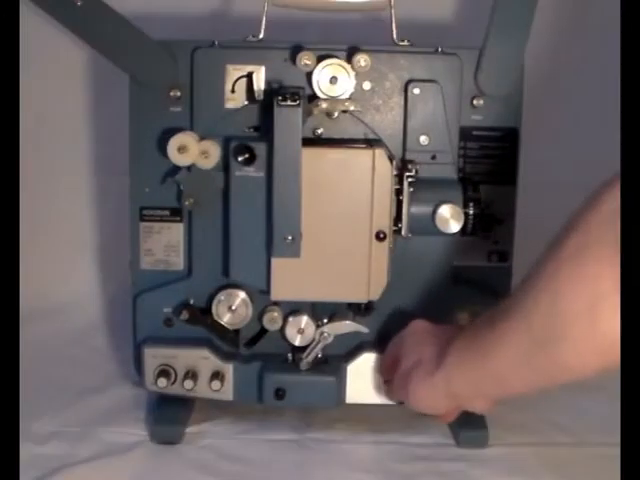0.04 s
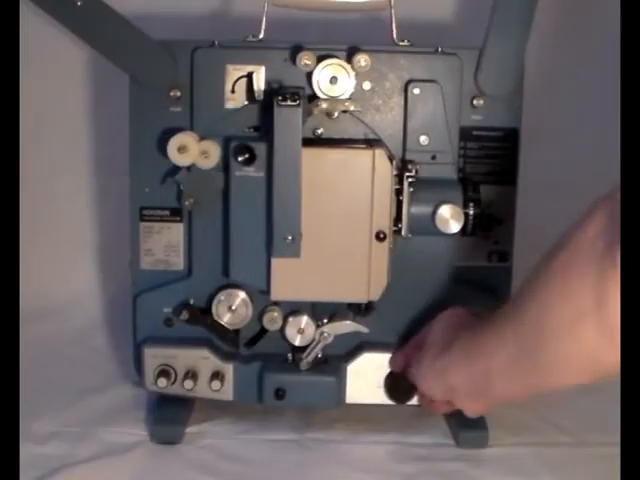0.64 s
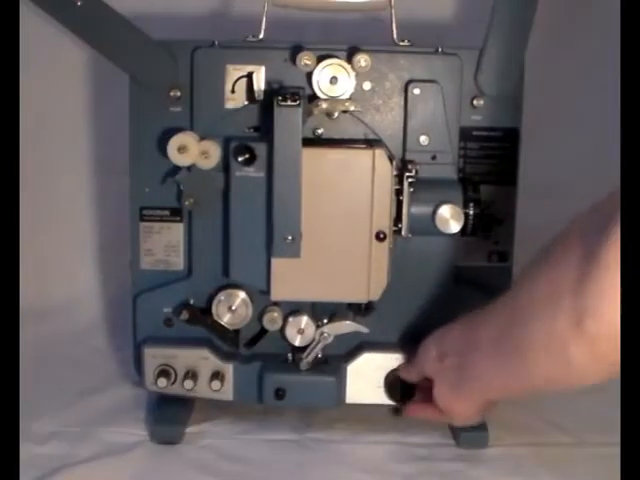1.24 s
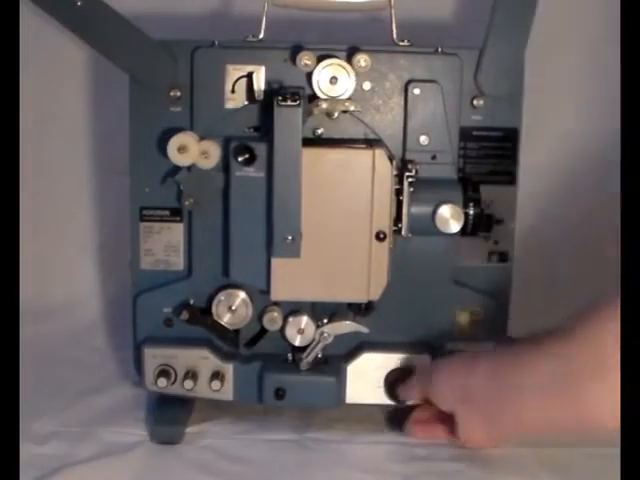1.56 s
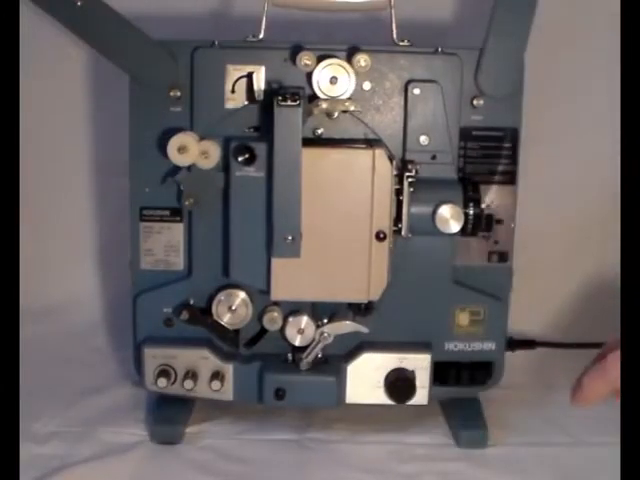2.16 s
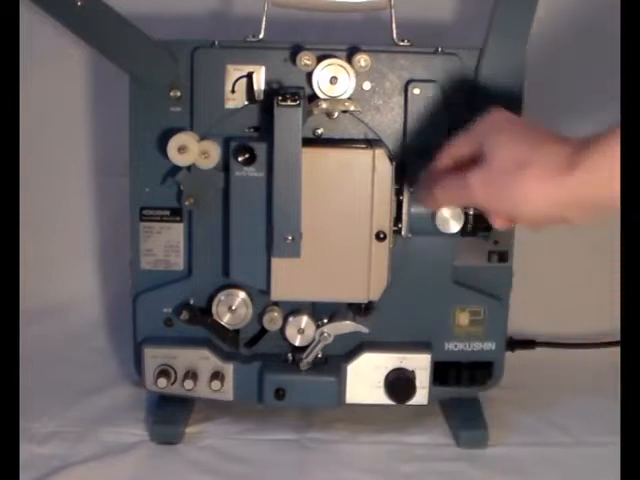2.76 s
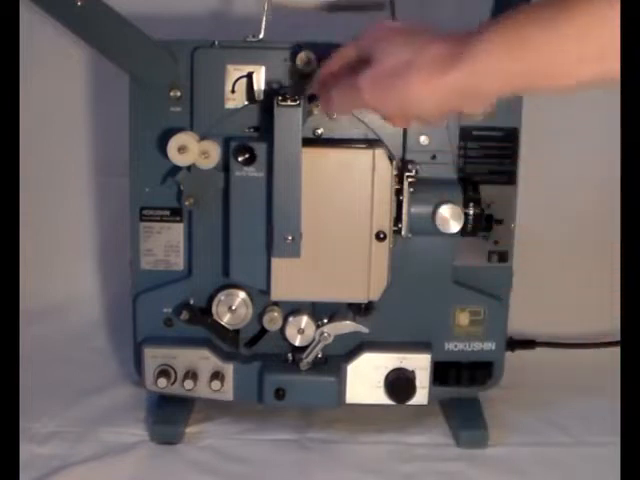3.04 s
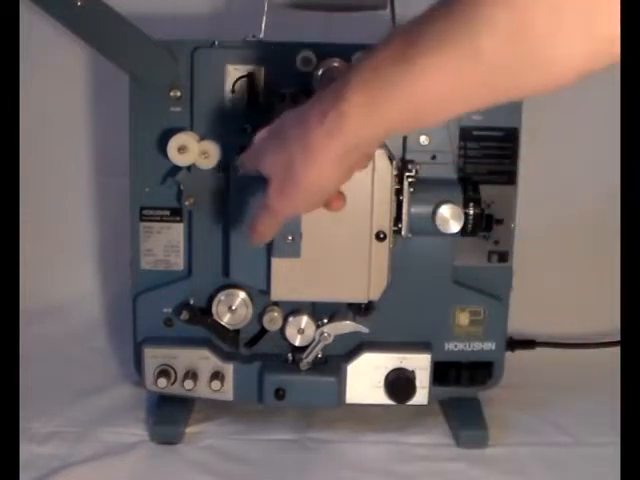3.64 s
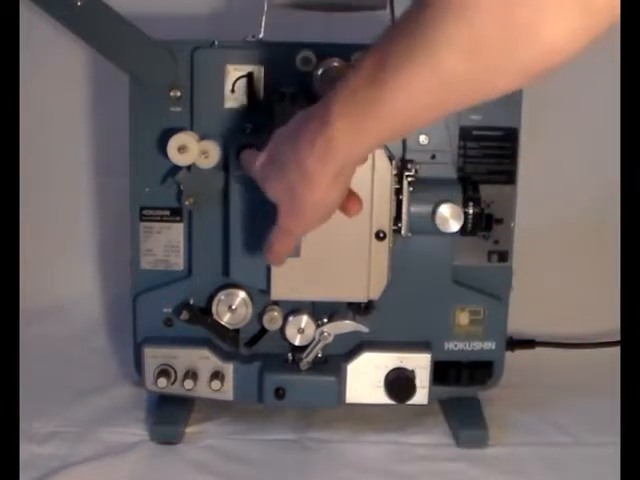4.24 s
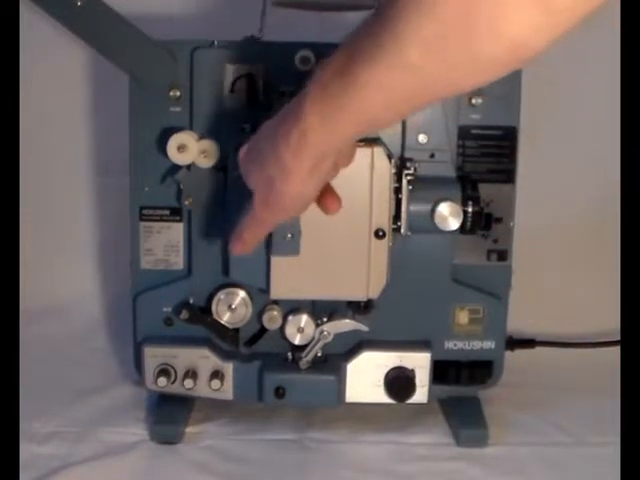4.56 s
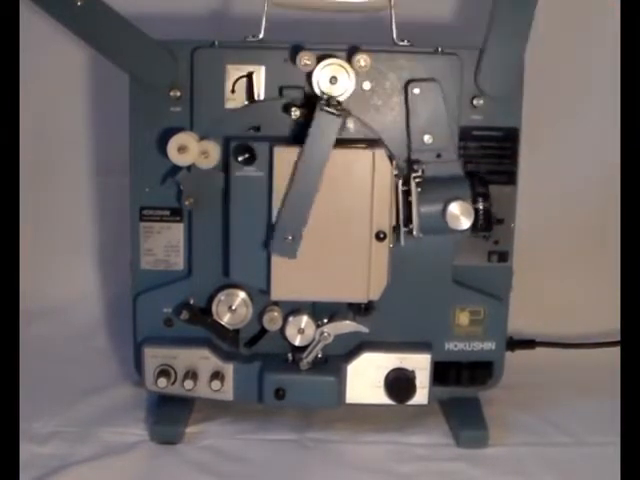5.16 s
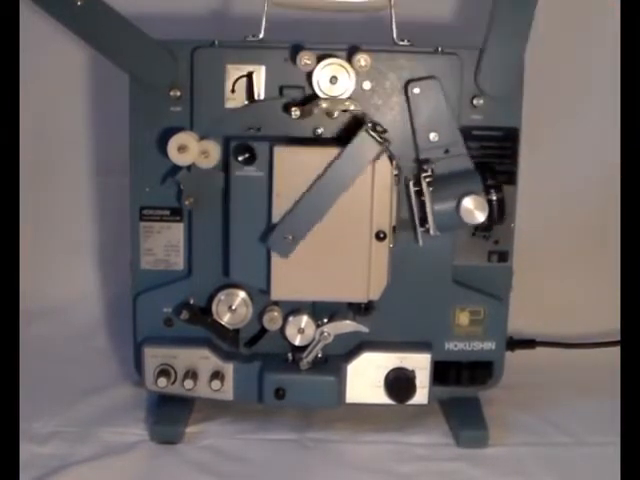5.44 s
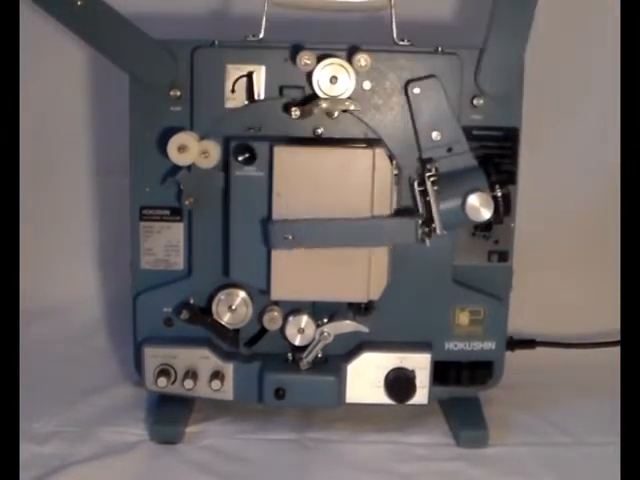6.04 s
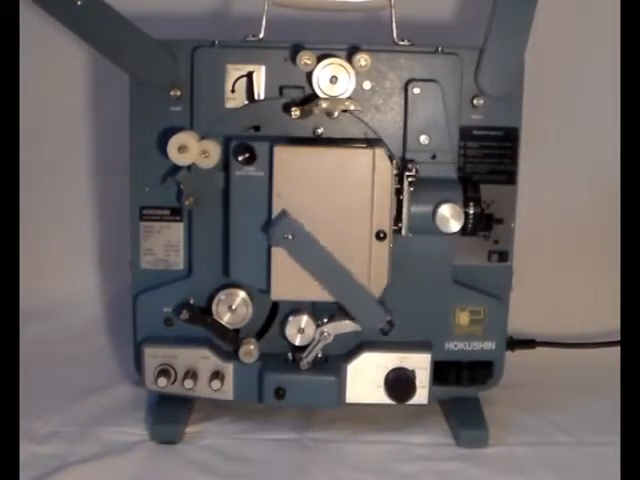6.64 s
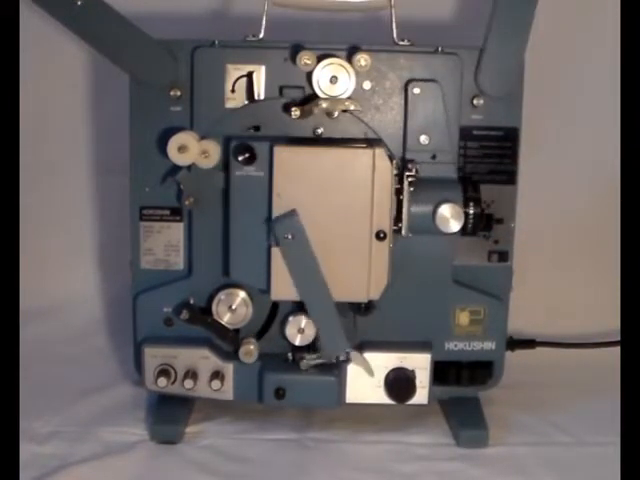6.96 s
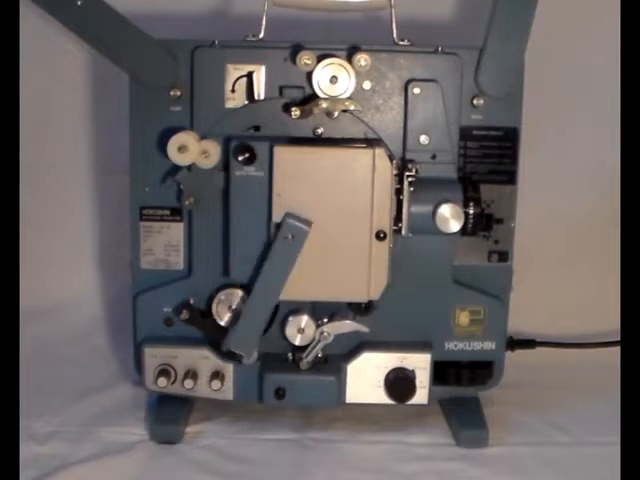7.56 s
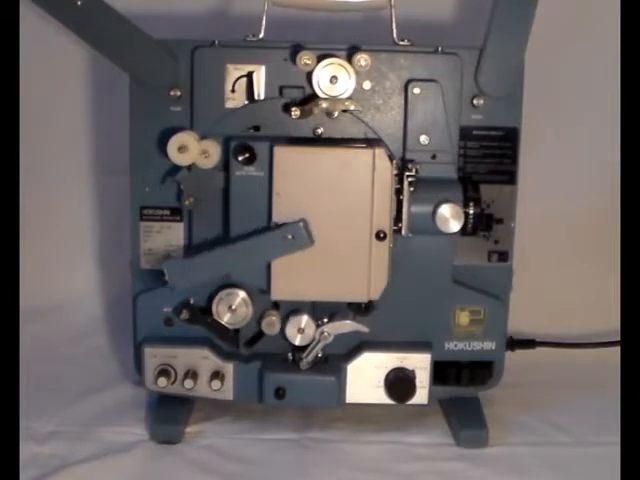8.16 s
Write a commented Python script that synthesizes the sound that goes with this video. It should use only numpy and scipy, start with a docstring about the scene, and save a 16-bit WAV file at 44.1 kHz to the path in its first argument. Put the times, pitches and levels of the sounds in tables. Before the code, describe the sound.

Fingers faintly rub and nudge a knob, then a switch clicks and a film projector starts with a brief growl. It settles into a rapid, even metallic clatter over a rushing fan and thin gear whine. Sharp lever clicks cut in, the clatter turns softer and slightly buzzy as the gate swings open, then returns with more clicks. The microphone is close in front, in a small room with a faint hum.

```python
"""Indoors, on a table, a film projector is switched on and clatters at 24 frames a second.
Each frame the claw and shutter cam strike the same contacts, which ring and excite the hollow case;
gears whine at harmonics of the frame rate and the fan rushes. A hand works the levers, and an arm
swings the film gate open and shut, unloading the claw meanwhile. Room air and a low hum lie beneath,
and the loudest clicks make the camera's gain control duck."""
import sys
import numpy as np
from scipy import signal
from scipy.fft import rfft, irfft, next_fast_len
from scipy.io import wavfile
from scipy.ndimage import uniform_filter1d, minimum_filter1d, map_coordinates

SR = 44100
rng = np.random.default_rng(int(sys.argv[2]) if len(sys.argv) > 2 else 0)


def master(y):
    """Save y as 16-bit WAV."""
    cut = np.clip(np.atleast_2d(y).T, -1, 1)
    pcm = np.round(cut * 32767)  # scale
    wavfile.write(sys.argv[1], SR, pcm.astype(np.int16))


N = 370440
TIME = np.arange(N) / SR
MOTOR_ON_S, FIRST_FRAME_S = 1.423, 1.4975


def amp(db):
    """Decibels as an amplitude ratio."""
    return 10 ** (np.asarray(db) / 20)


def unit(x):
    """Normalisation to rms 1."""
    return x / np.sqrt(np.mean(x ** 2) + 1e-20)


def along(points, hz):
    """Interpolation of (Hz, value) points on a log frequency axis."""
    f, v = np.transpose(points)
    return np.interp(np.log(hz + 1), np.log(f + 1), v)


def curve(rows):
    """Linear interpolation of (seconds, value) rows at every sample."""
    return np.interp(TIME, *np.transpose(rows))


def wobble(rate):
    """Smooth random modulation with rate knots a second."""
    knots = rng.standard_normal(int(N * rate / SR) + 4)
    return map_coordinates(knots, [TIME * rate])


def filtered(x, response):
    """Linear filtering: the spectrum of x times a frequency response."""
    n = x.shape[-1]
    m = next_fast_len(n + 4096)
    return irfft(rfft(x, m) * response(np.fft.rfftfreq(m, 1 / SR)), m)[..., :n]


def coloured(x, spectrum):
    """Spectral shaping by (Hz, dB) points."""
    return filtered(x, lambda hz: amp(along(spectrum, hz)))


def noise(spectrum, size):
    """Coloured noise of rms 1."""
    return unit(coloured(rng.standard_normal(size), spectrum))


def narrow(centre_hz, width, size):
    """Noise of rms 1 in one resonance; width is a share of its frequency."""
    white = rng.standard_normal(size)
    return unit(filtered(white, lambda hz: 1 / (1 + ((hz / centre_hz - 1) / width) ** 2)))


def fade(t, t60):
    """Exponential decay by 60 dB in t60 seconds."""
    return np.exp(-np.log(1000) * t / t60)


def short_level(x, size=66):
    """Running rms over a millisecond and a half."""
    return np.sqrt(np.abs(uniform_filter1d(x ** 2, size, mode='constant')) + 1e-14)


def add(track, s, sound):
    """Superposition of a sound on the track at s seconds."""
    start = max(round(s * SR), 0)
    part = track[start:start + len(sound)]
    part += sound[:len(part)]


# Spectrum of the room air. Each row: frequency in Hz, relative level in dB.
AIR_SPECTRUM = [(12, -44), (20, -25), (54, -19.5), (119, -15.5), (156, -23), (211, -22), (256, -23),
                (302, -25.5), (9030, -38.5), (12900, -38.5), (14000, -60)]
# Envelope of the hum. Each row: time in seconds, level in dB.
HUM_LEVELS = [(1.4, -52), (1.7, -60), (5, -60)]

def background(air_db=-57, hum_hz=45.4, side_db=-9):
    """Partly correlated noise gives the air width; a low hum sinks once the machine runs."""
    hum = amp(curve(HUM_LEVELS) + wobble(8)) * np.sin(2 * np.pi * hum_hz * TIME + 0.34 * wobble(6.9))
    mid, side = noise(AIR_SPECTRUM, N), amp(side_db) * noise(AIR_SPECTRUM, N)
    return hum + amp(air_db) * np.array([mid + side, mid - side])


# Spectrum of a touch or knock on the case. Each row: frequency in Hz, relative level in dB.
KNOCK_SPECTRUM = [(60, -40), (200, -14), (550, -8), (1200, -11), (2500, -16.5), (6000, -25)]
# Nudges of the switch knob. Each row: start in seconds, level in dB.
KNOB_NUDGES = [(.074, -52.5), (.925, -54), (1.258, -62)]

def handling(rub_db=-52, rub_t60=1.0, nudge_s=0.0078):
    """Friction and soft impact: fingers rub the switch knob and nudge it."""
    touch = amp(rub_db + 2.9 * wobble(58)) * fade(TIME, rub_t60)
    for s, db in KNOB_NUDGES:
        age = np.maximum(TIME - s, 0) / nudge_s
        touch += amp(db) * age * np.exp(1 - age)
    return touch * noise(KNOCK_SPECTRUM, N)


# Spectrum of a click's bright snap. Each row: frequency in Hz, relative level in dB.
SNAP_SPECTRUM = [(1000, -40), (2500, -5), (5500, 7), (8500, 3), (10500, 5), (12300, 2.5), (14000, -10)]
# Sharp clicks of switch, levers and gate, and two extra-sharp strokes of the clatter. Each row: start
# in seconds, peak level in dB before the bass cut, clack in Hz, snap over clack in dB, snap tilt in
# dB per octave, zing in Hz, zing over clack in dB, t60 in seconds.
SHARP_CLICKS = [(.0758, -36, 3370, -10, -9, 3960, -7, 0.015), (1.4138, -21, 2600, -2, -9, 5350, -7, 0.014),
                (1.426, -21, 4430, -10, -1, 6500, -13, 0.0084), (1.437, -27, 2910, 6, 6, 6500, -6, 0.013),
                (4.6029, -13, 4600, -2, 15, 9360, 3, .011), (4.6063, -22.5, 4500, -2, 1, 4740, 6, 0.017),
                (4.896, -6, 3440, -9, -7, 3760, -6, 0.013), (4.8994, -13, 2880, -12, -8, 3840, -2, 0.02),
                (5.5847, -10.5, 3370, -11, -8, 12500, -9, 0.012), (5.6083, 1, 3020, 5, 1, 12400, 6, 0.0085),
                (5.6168, -10, 5200, 2, 1, 12400, 11, 0.016), (7.1274, -21, 4220, -6, -1, 7240, -7, 0.0037),
                (7.2267, -21, 3480, -23, -6, 4070, -8, .008),
                (7.3928, -21, 3600, -10.5, -6, 4100, -5, 0.0085),
                (7.4154, -0.5, 3930, 0, 3, 12800, 2.5, 0.0037), (7.433, -7.5, 3700, -3, 8, 3970, -1, 0.014),
                (7.927, -22.5, 4300, -6, 2, 6440, -3, .02), (8.042, -18, 4230, -15, -9, 3060, 3, 0.041),
                (8.0482, -1, 3040, 1, 3, 14000, -4, 0.0063), (8.057, -16, 2950, 0, 1.5, 6600, 9, 0.018)]

def clicks(rise_s=0.0004, knock_db=-22, knock_t60=0.091, clack_width=0.23, zing_width=0.03,
           shiver_db=-23, shiver_t60=0.16, shiver_rise_s=0.0028):
    """Impact excitation: steel clacks and rings, the case knocks and small parts shiver after."""
    t = np.arange(SR // 5) / SR
    track = np.zeros(N)
    onset = 1 - np.exp(-t / rise_s)
    shiver = amp(shiver_db) * (1 - np.exp(-t / shiver_rise_s)) * fade(t, shiver_t60)
    for s, level_db, clack_hz, snap_db, tilt_db, zing_hz, zing_db, t60 in SHARP_CLICKS:
        knock = amp(knock_db) * fade(t, knock_t60) * noise(KNOCK_SPECTRUM, len(t))
        snap = noise(SNAP_SPECTRUM, len(t))
        # harder contacts are brighter
        snap = filtered(snap, lambda hz: amp(tilt_db * np.log2(np.maximum(hz, 4000) / 8000)))
        metal = narrow(clack_hz, clack_width, len(t)) + amp(snap_db) * snap
        zing = amp(zing_db) * narrow(zing_hz, zing_width, len(t))
        click = onset * (knock + fade(t, t60) * (metal + zing) + shiver * metal)
        add(track, s, amp(level_db) * click / short_level(click).max())
    # the clicks carry almost no bass
    return signal.sosfilt(signal.butter(2, 250, 'high', fs=SR, output='sos'), track)


def start_growl(growl_hz=260, width=0.21, growl_db=-49, peak_s=0.034):
    """Starting transient: the motor growls as it pulls the mechanism up to speed."""
    age = np.maximum(TIME - MOTOR_ON_S, 0) / peak_s
    return amp(growl_db) * age * np.exp(1 - age) * narrow(growl_hz, width, N)


# Swells as the levers bear on the mechanism. Each row: centre in seconds, gain in dB.
LOAD_SWELLS = [(1.919, 0), (3.051, 1), (4.54, 1.5), (5.52, 1.5), (7.25, 0), (8.38, 5.5)]

def motor_gain(spin_up_s=0.11, steepness=1.77, run_db=-29.5, surge_db=5, settle_s=0.076, swell_s=0.11):
    """Overshoot and settling: the machine's level surges, steadies and then swells under load."""
    rise = np.clip((TIME - MOTOR_ON_S) / spin_up_s, 0, 1) ** steepness
    surge = np.exp(-np.maximum(TIME - MOTOR_ON_S - spin_up_s, 0) / settle_s)
    load_db = sum(db * np.exp(-((TIME - s) / swell_s) ** 2) for s, db in LOAD_SWELLS)
    return rise * amp(run_db + surge_db * surge + load_db)


# Modes of the hollow case. Each row: frequency in Hz, bandwidth in Hz, gain in dB.
CASE_MODES = [(463, 8.1, -12), (577, 31, -0.5), (780, 35, -3), (934.5, 80, -2), (1085, 17, -5),
              (1182, 17, -3), (1500, 41.5, -7.5), (1640, 24, 2), (1774, 50, -5), (2248, 42, 2.5),
              (2490, 65, -13), (2840, 85, -4.5), (3190, 67, -1), (3540, 130, -2.5), (4130, 79, -14)]

def hollow_case(x):
    """Modal resonance: the case adds its ringing to x; the result has rms 1."""
    def response(hz):
        return 1 + sum(amp(db) * width / (width + 2j * (hz - centre))
                       for centre, width, db in CASE_MODES)
    return unit(filtered(x, response))


# Spectrum of rattling in the case. Each row: frequency in Hz, relative level in dB.
RATTLE_SPECTRUM = [(50, -56), (100, -20), (300, -16), (460, -8.5), (590, -13), (720, -18), (850, -12),
                   (1300, -5.5), (1600, -5), (2800, -3), (3500, -2.5), (4200, -5), (4380, -9.5),
                   (5200, -11), (6500, -22), (12000, -23), (14000, -49.5)]

def spin_up(grind_db=-2, take_up_s=0.043, softening=0.3):
    """Backlash: slack softens the strokes and the gears grind. Returns stroke gain and grinding."""
    slack = np.exp(-np.maximum(TIME - FIRST_FRAME_S, 0) / take_up_s)
    grinding = amp(grind_db) * slack * hollow_case(noise(RATTLE_SPECTRUM, N))
    return 1 - softening * slack, grinding


def gate_grip(open_s=5.185, shut_s=6.8, release_s=0.098, take_up_s=0.07,
              shut_db=-4.7, ajar_db=-14.65, swing_db=-23, slack_db=-5):
    """Contact force: the claw takes up its slack, then loses its grip while the gate swings open."""
    ajar = np.clip(np.minimum(TIME - open_s, shut_s - TIME) / release_s, 0, 1)
    swing = np.sin(np.pi * np.clip((TIME - open_s) / (shut_s - open_s), 0, 1)) ** 2
    slack = np.exp(-np.maximum(TIME - FIRST_FRAME_S, 0) / take_up_s)
    return amp(shut_db + ajar_db * ajar + swing_db * swing + slack_db * slack)


def loaded(grip, share):
    """Partial coupling: the gain of a part when a share of its sound follows the grip."""
    return 1 + share * (grip - 1)


# Gear and motor tones. Each row: multiple of the frame rate (rounded when played), relative level
# in dB, share that follows the grip.
GEAR_HARMONICS = [(4, -30, 0), (8, -28, 0.05), (14, -21.5, 0.66), (18, -23.5, 0.1), (19, -14.5, 0.65),
                  (24, -13.5, 0.49), (26, -18, 0.53), (28, -24.5, 0.15), (33, -19.5, 0.2), (36, -23, 0.1),
                  (45, -17.5, 0.9), (48, -15, 0.68), (49, -17, 0.98), (58, -20, 0.2), (61, -14.5, .95),
                  (62, -14.5, 0.78), (67.77, -18.5, 0.26), (71, -18, 0.65), (93, -15, 0.3)]

def gears(turns, grip, waver_db=2.0, drift_rad=0.36, whine_db=-1):
    """Periodic meshing: slightly unsteady harmonics locked to the shaft, stronger under load."""
    whine = np.zeros(N)
    for multiple, db, share in GEAR_HARMONICS:
        level = amp(db + waver_db * wobble(6)) * loaded(grip, share)
        phase = 2 * np.pi * (round(multiple) * turns + rng.random())
        whine += level * np.sin(phase + drift_rad * wobble(14))
    return amp(whine_db) * whine


# Spectrum of the fan's rush. Each row: frequency in Hz, relative level in dB.
FAN_SPECTRUM = [(35, -34), (60, -10.5), (150, -15.5), (190, -4.5), (260, -6), (335, 0.5), (590, -3.5),
                (720, -5.5), (860, -2.5), (1300, -3.5), (2400, -1.5), (3400, -3.5), (4150, -3), (4400, -10),
                (6500, -19), (11500, -22.5), (14000, -46.5)]

def fan(fan_db=-6.5):
    """Broadband flow noise, coloured by the modes of the case."""
    return amp(fan_db) * hollow_case(noise(FAN_SPECTRUM, N))


def bearing(sing_hz=8850, sing_db=-30, width=0.012):
    """Narrowband resonance: a bearing sings thinly."""
    return amp(sing_db) * narrow(sing_hz, width, N)


# Spectrum of the trembling table. Each row: frequency in Hz, relative level in dB.
TABLE_SPECTRUM = [(12, -15), (25, 7), (50, 0), (75, -11), (160, -16), (600, -80)]

def trembling(grip, table_db=-33, buzz_hz=2470, buzz_width=0.045, buzz_db=-13):
    """Forced vibration: the machine shakes the table, and the gate buzzes more the looser it hangs."""
    rumble = amp(table_db) * noise(TABLE_SPECTRUM, N)
    buzz = amp(buzz_db) * (1 - grip) ** 2 * narrow(buzz_hz, buzz_width, N)
    return rumble + buzz


# Contacts in one turn of the cam. Each row: delay in seconds, relative rattle level in dB, ring
# frequency in Hz, ring level in dB, ring t60 in seconds, share that follows the grip.
CAM_CONTACTS = [(-.0035, -3, 4052, 7.5, 0.032, 0.9), (-.0009, -0.5, 3540, 11.5, 0.0099, 0.67),
                (-.0008, -5, 2426, 2, 0.045, .4), (0, -11.5, 550, 2, 0.014, 0),
                (.0016, -3.5, 1630, 10, 0.013, 0.7), (.0055, -2, 1481, 3.5, 0.034, 0.74),
                (0.0134, -7.5, 1424, 2.5, 0.024, .5), (0.015, -13.5, 3490, 3.5, .026, .15),
                (0.018, -7, 3250, 6.5, 0.021, 0.17), (.022, -5.5, 3376, 2, 0.0325, 0.63),
                (.03, -5.5, 2564, -2, 0.053, 0.8)]

def cam_clatter(frames, grips, rattle_db=-6.0, rattle_t60=0.024, repeat_share=0.28,
                ring_db=-1.0, attack_s=0.00059, detune=0.011, jitter_s=0.00003, scatter_db=0.97):
    """Periodic impacts: each contact rings its own part and rattles the case, much alike each frame."""
    t = np.arange(SR // 20) / SR
    rattles, rings = np.zeros(N), np.zeros(N)
    decay = fade(t, rattle_t60)
    for delay, contact_db, hz, part_db, t60, share in CAM_CONTACTS:
        repeating = np.sqrt(repeat_share) * rng.standard_normal(len(t))
        envelope = amp(part_db) * (1 - np.exp(-t / attack_s)) * fade(t, t60)
        for s, grip in zip(frames, grips):
            force = amp(scatter_db * rng.normal()) * loaded(grip, share)
            strike_s = s + delay + jitter_s * rng.normal()
            rattle = repeating + np.sqrt(1 - repeat_share) * rng.standard_normal(len(t))
            add(rattles, strike_s, force * amp(contact_db) * decay * rattle)
            ring_s = strike_s + jitter_s * rng.normal()
            ring_hz = hz * (1 + detune * rng.normal())
            add(rings, ring_s, force * envelope * np.sin(2 * np.pi * ring_hz * t))
    return amp(rattle_db) * hollow_case(coloured(rattles, RATTLE_SPECTRUM)) + amp(ring_db) * rings


# Spectrum of the claw sliding on the gate. Each row: frequency in Hz, relative level in dB.
SCRAPE_SPECTRUM = [(2500, -20), (4100, 5), (4500, 3.5), (5300, -1), (7500, -5), (9000, 0), (9800, 6),
                   (10800, -3.5), (12100, 2), (13300, -1), (14200, -22)]

def claw_scrape(frames, grips, lead_s=0.0005, slide_s=0.0019, rise_s=0.0013, fall_s=0.0016,
                scrape_db=-3.5, grain=0.19, tail_db=-14, tail_t60=0.48):
    """Sliding friction: the claw scrapes the gate before it lands and leaves a faint bright ring."""
    t = np.arange(SR // 16) / SR - 0.01  # zero at the landing
    after = np.maximum(t, 0)
    rise = np.exp(np.minimum((t + slide_s) / rise_s, 0))
    fall = np.exp(-after / fall_s) + amp(tail_db) * fade(after, tail_t60)
    strokes = np.zeros(N)
    for s, grip in zip(frames, grips):
        add(strokes, s - lead_s + t[0], grip * amp(0.66 * rng.normal()) * rise * fall)
    roughness = np.exp(grain * wobble(1500))
    return amp(scrape_db) * strokes * roughness * noise(SCRAPE_SPECTRUM, N)


def claw_ping(frames, grips, claw_hz=3205, bend=0.15, settle_s=0.001398, detune=0.008,
              attack_s=0.0005, t60=0.07, stop_s=0.01, jitter_s=0.00005,
              claw_db=11, uneven_db=0.84, grip_share=0.61, lever_s=4.61, eased_db=-2.0):
    """Damped vibration: the steel claw lands with a ping that drops in pitch and is stopped short."""
    t = np.arange(SR // 50) / SR
    cycles = claw_hz * (t + bend * settle_s * (1 - np.exp(-t / settle_s)))
    envelope = (1 - np.exp(-t / attack_s)) * fade(t, t60) / (1 + (t / stop_s) ** 8)
    track = np.zeros(N)
    for s, grip in zip(frames, grips):
        # softer once the lever is thrown; weak landings vary more in pitch and level
        force = loaded(grip, grip_share) * amp(eased_db * (s > lever_s))
        ping = envelope * np.sin(2 * np.pi * cycles * (1 + detune / force * rng.normal()))
        start_s = s - attack_s + jitter_s * rng.normal()
        level = force * amp(claw_db + uneven_db / np.sqrt(force) * rng.normal())
        add(track, start_s, level * ping)
    return track


def labouring(centre_s=2.345, width_s=0.045, softening=0.32, grind_hz=1200, grind_db=-9):
    """Amplitude modulation: a few strokes soften as grinding rises. Returns stroke gain and grinding."""
    amount = np.exp(-((TIME - centre_s) / width_s) ** 2)
    grinding = amp(grind_db) * amount * narrow(grind_hz, 0.45, N)
    return 1 - softening * amount, grinding


# Running speed of the shaft. Each row: time in seconds, rate in frames a second.
FRAME_RATES = [(1.5, 24.14), (2.5, 24.13), (3, 24.11), (5, 24.10), (5.35, 23.92), (5.8, 24.08),
               (6.4, 24.105), (6.9, 23.99), (7.5, 24.04), (8, 24.1)]

def projector():
    """Phase locking: one shaft times cam, claw and gears, over the noise of fan, bearing and table."""
    turns = np.cumsum(curve(FRAME_RATES)) / SR
    turns -= turns[round(FIRST_FRAME_S * SR)]
    starts = np.searchsorted(turns, np.arange(int(turns[-1]) + 1))  # one frame a turn
    grip = gate_grip()
    frames, grips = starts / SR, grip[starts]
    strokes = cam_clatter(frames, grips) + claw_ping(frames, grips) + claw_scrape(frames, grips)
    whirr = gears(turns, grip) + fan() + bearing()
    start_gain, start_grind = spin_up()
    labour_gain, labour_grind = labouring()
    strokes *= start_gain * labour_gain
    return motor_gain() * (strokes + start_grind + labour_grind + whirr + trembling(grip))


# Reverberation time of the room. Each row: frequency in Hz, t60 in seconds.
ROOM_T60 = [(200, 0.091), (3000, 0.225), (12000, 0.1)]

def reverberation(x):
    """Diffuse decay: after a 4 ms delay, each frequency dies away at its own rate."""
    hz, t, bands = signal.stft(rng.standard_normal(SR // 3), SR, nperseg=256)
    tail = signal.istft(bands * fade(t, along(ROOM_T60, hz)[:, None]), SR, nperseg=256)[1]
    response = np.pad(tail, (SR // 250, 0)) / np.linalg.norm(tail)
    return signal.fftconvolve(x, response)[:N]


# Width of the sound. Each row: frequency in Hz, side level against mid in dB.
SIDE_LEVELS = [(60, -6), (110, -17.5), (200, -21), (370, -26.5), (690, -21.5), (1270, -25.5), (2330, -13),
               (4300, -11.5), (7910, -1), (14600, -3)]

def scattering(mid):
    """Decorrelation: sound from many directions takes random phases, giving a mostly treble side."""
    bands = signal.stft(mid, nperseg=256)[2]
    spread = signal.istft(bands * np.exp(2j * np.pi * rng.random(bands.shape)), nperseg=256)[1][:N]
    return coloured(unit(spread) * np.std(mid), SIDE_LEVELS)


def scene(room_db=-11):
    """Superposition of direct and diffuse sound, with the projector straight ahead."""
    direct = projector() + clicks() + handling() + start_growl()
    mid = direct + amp(room_db) * reverberation(direct)
    side = scattering(mid)
    return np.array([mid + side, mid - side]) + background()


def held(x, size):
    """Peak hold: the largest of the last size samples."""
    return -minimum_filter1d(-x, size, origin=(size - 1) // 2)


def released(x, release_s):
    """Envelope following: up at once with a positive x, down exponentially."""
    age = TIME / release_s
    return np.exp(np.maximum.accumulate(np.log(x + 1e-9) + age) - age)


def gain_control(x, ceiling_db=-17, release_s=0.27, held_share=0.51, hold_s=0.48,
                 held_release_s=0.12, window=176):
    """Look-ahead limiting: a loud click cuts the gain; part recovers directly, the rest after a hold."""
    over_db = np.maximum(20 * np.log10(short_level(x.mean(axis=0))) - ceiling_db, 0)
    lasting_db = released(held_share * held(over_db, int(hold_s * SR)), held_release_s)
    cut_db = np.maximum(released(over_db, release_s), lasting_db)
    ahead_db = np.pad(cut_db[window // 2:], (0, window // 2), mode='edge')
    return x * amp(-uniform_filter1d(ahead_db, window))


def record(dry):
    """Compression and band limiting: the camera rides its gain and cuts the highest treble steeply."""
    top_hz = 14250
    return filtered(gain_control(dry), lambda hz: 1 / np.sqrt(1 + (hz / top_hz) ** 140))


dry = scene()
out = record(dry)
master(out)
```